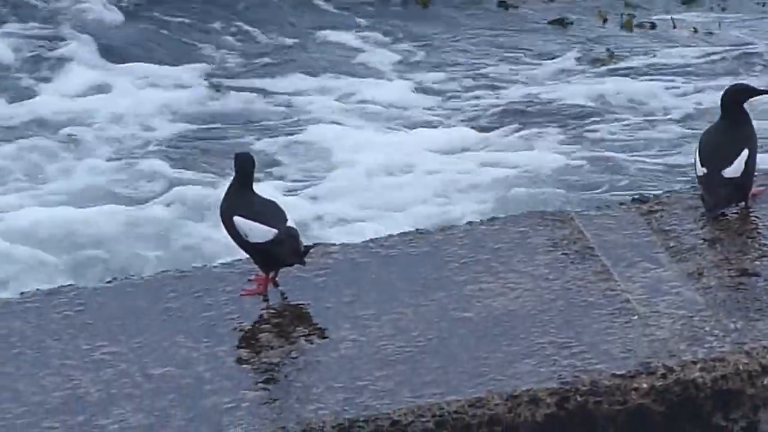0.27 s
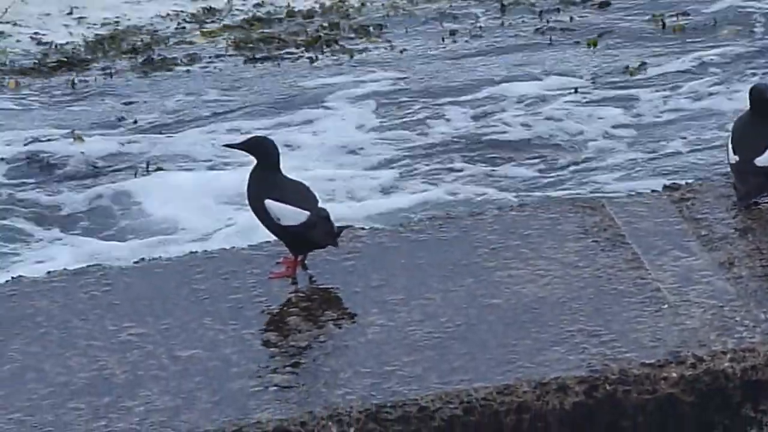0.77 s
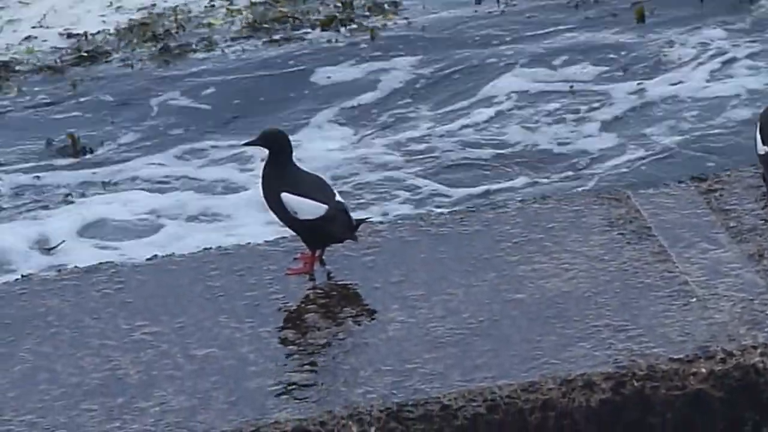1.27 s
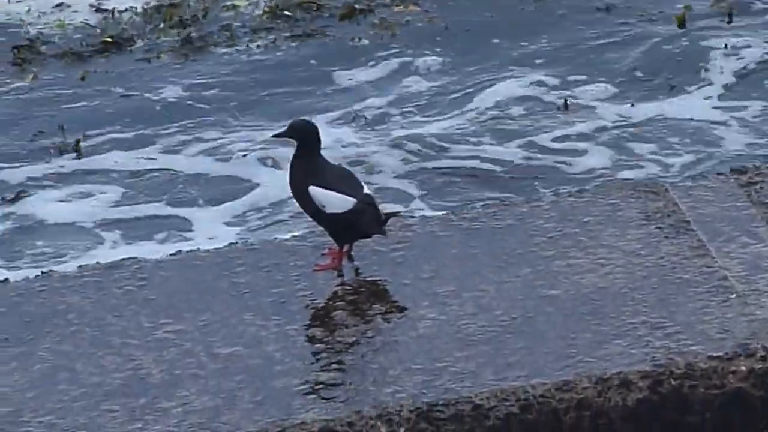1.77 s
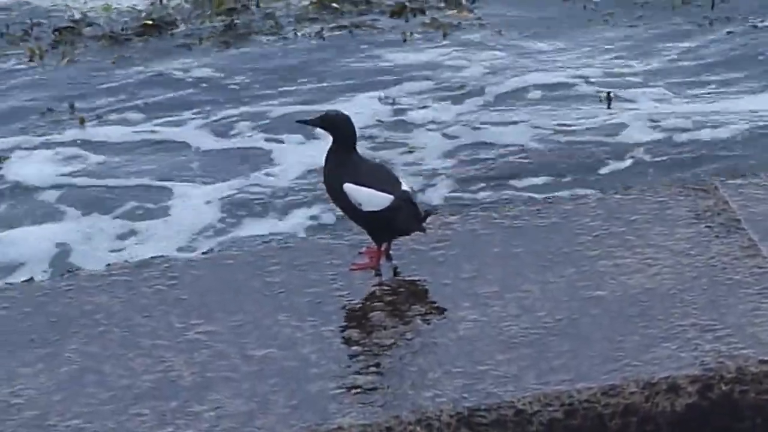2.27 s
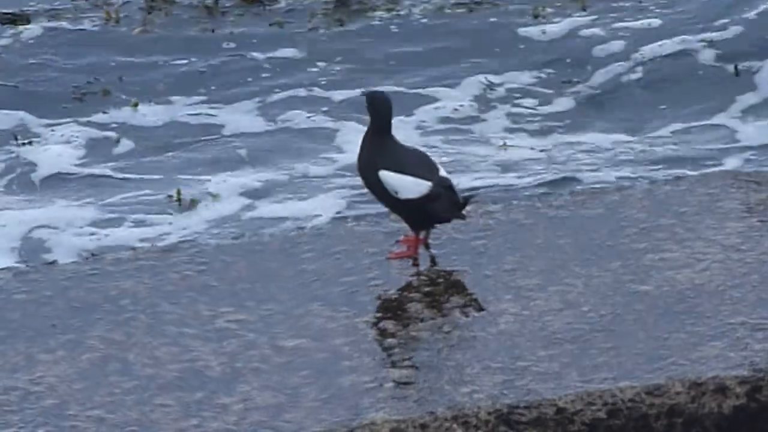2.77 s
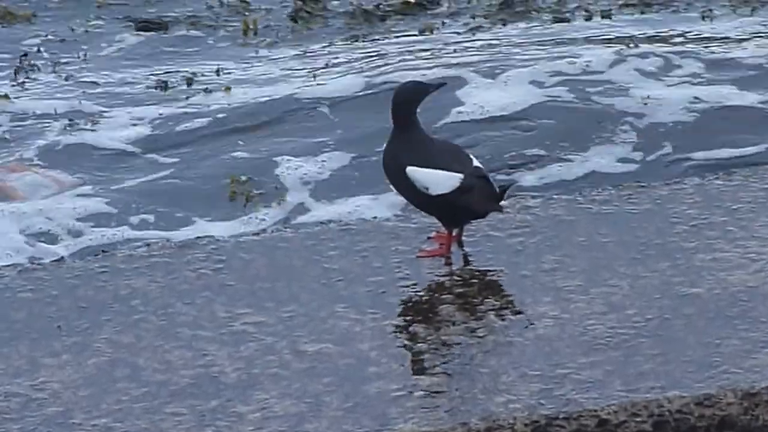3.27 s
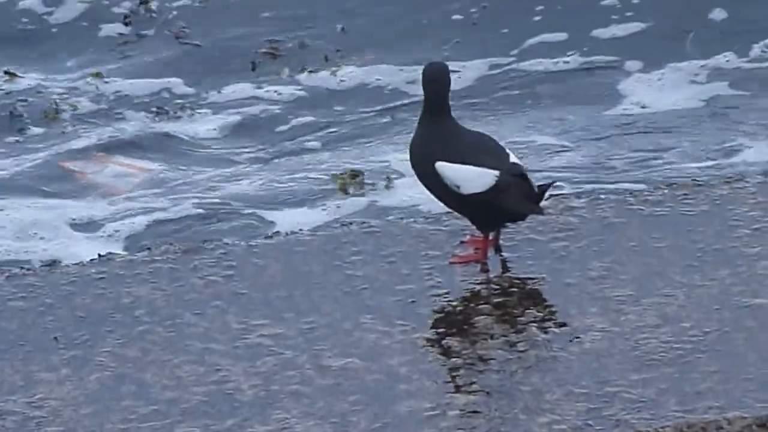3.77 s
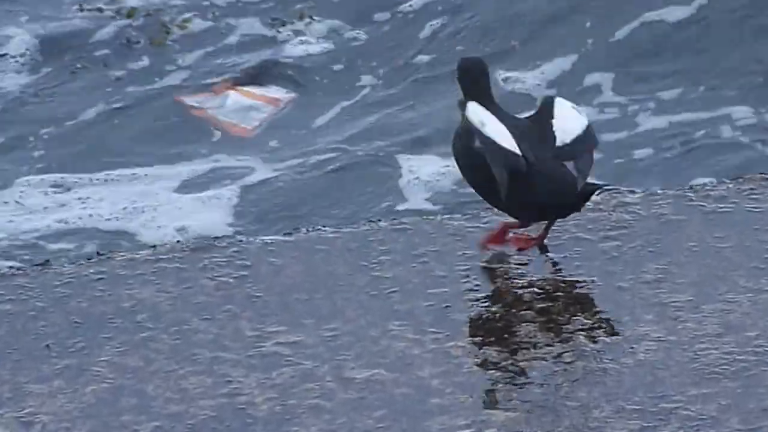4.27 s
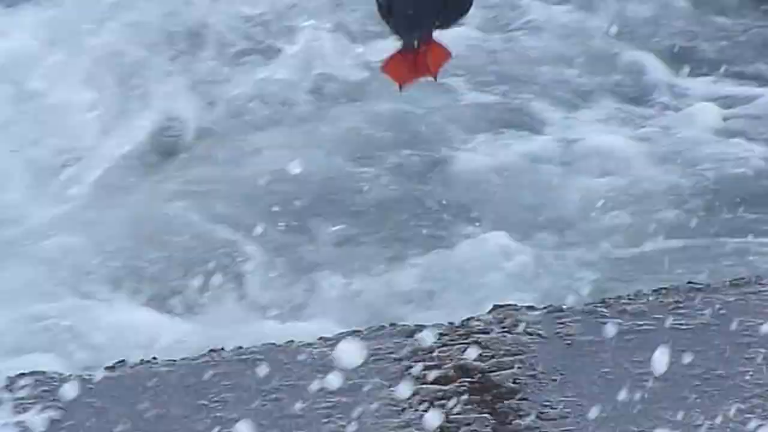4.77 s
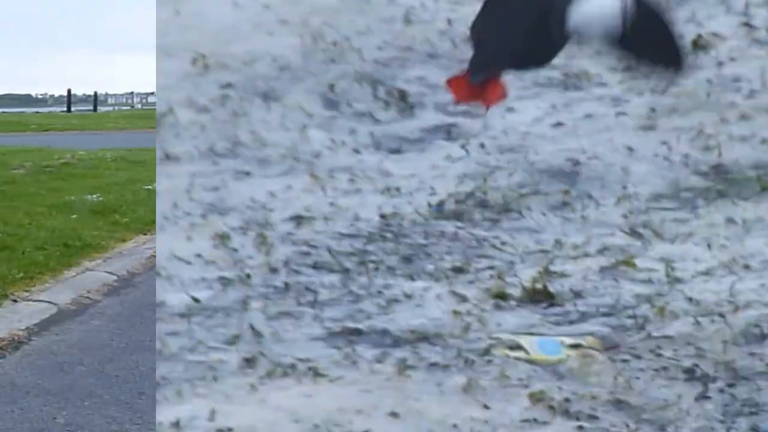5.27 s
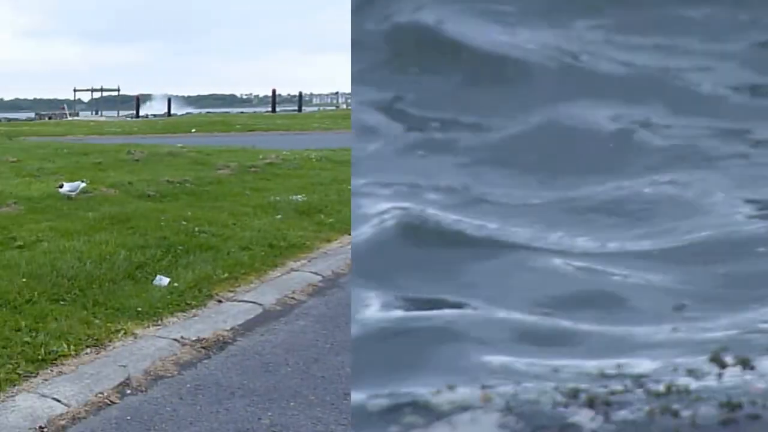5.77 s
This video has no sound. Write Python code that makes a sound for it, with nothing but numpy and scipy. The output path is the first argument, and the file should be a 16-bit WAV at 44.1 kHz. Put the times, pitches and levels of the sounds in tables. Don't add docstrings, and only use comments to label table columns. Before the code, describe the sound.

A rough sea churns against a concrete slipway a few metres from a small stereo camera. The sound is a continuous mid-heavy roar of bubbles and wash, thin in deep bass and limited in the high treble, swelling every fraction of a second. Wind buffets the microphones from the start, with a gust at 0.2 s and another near 0.6. In a short lull around 1.1 to 1.3 s, a surge brings a rapid cluster of short, hollow low slaps on concrete. From 1.5 s gusts return, rumbling and popping unevenly left and right, heavier at 2.6 and from 3.3 to 4.4 s, where they overload and make the level dip. Isolated dull slaps come near 2.1, 2.9 and 3.7 s. Around 4.7 to 5.1 s a brighter splash breaks with more thuds. After 5.3 s the surf recedes while gusts continue until about 5.9 s, leaving a weaker wash.

```python
import sys
import numpy as np
from scipy import signal
from scipy.fft import rfft, irfft, next_fast_len
from scipy.io import wavfile
from scipy.ndimage import uniform_filter1d

SR = 44100
rng = np.random.default_rng(int(sys.argv[2]) if len(sys.argv) > 2 else 0)


def to_wav(sig):
    pcm = np.clip(np.atleast_2d(sig), -1, 1) * 32767
    pcm = np.round(pcm).astype(np.int16)
    wavfile.write(sys.argv[1], SR, pcm.T)


def to_linear_factor(level_db):
    exponent = np.asarray(level_db, float) / 20
    return 10 ** exponent


N = 265967
TIME = np.arange(N) / SR
SIZE = next_fast_len(N + 8000)
BINS_HZ = np.maximum(np.arange(SIZE // 2 + 1) * SR / SIZE, 1)


def rms_one(x):
    return x / np.sqrt(np.mean(x ** 2) + 1e-20)


def at_hz(points, hz):
    table = np.array(points, float)
    return np.interp(np.log(hz), np.log(np.maximum(table[:, 0], 1)), table[:, 1])


def drift(rate):
    pole = np.exp(-80 * np.pi * rate / SR)
    noise = rng.standard_normal(N // 40 + 2002)
    slow = signal.lfilter([1], [1, -2 * pole, pole * pole], noise)[2000:]
    return np.interp(np.arange(N) / 40, np.arange(len(slow)), rms_one(slow))


def grainy(per_s, spread_db):
    sizes = to_linear_factor(spread_db * np.minimum(rng.exponential(1, SIZE), 3.5))
    signs = rng.choice([-1, 1], SIZE)
    happens = rng.random(SIZE) < per_s / SR
    return rms_one(sizes * signs * happens)


def surf():
    layers_hz = [500, 1500, 3500, 6500]
    # pitch_hz [Hz], level_db [dB per Hz]
    colour = [(40, -35.5), (130, -15), (220, -3.5), (320, 0.5), (800, 3.5), (1200, 0), (1700, -4.5),
              (2400, -3.5), (3500, 0.5), (5000, -5), (6200, -1.5), (7500, -8.5), (8600, -17.5), (9600, -18)]
    # pitch_hz [Hz], likeness [0 to 1]
    likeness = [(60, 0.88), (150, 1), (400, 1), (1000, 1), (1700, 0.81), (3000, 0.42), (5200, 0.42),
                (9000, .45)]
    # pitch_hz [Hz], lead_rad [radians]
    left_leads = [(0, 0), (1210, 0.2), (2500, 0.9), (3010, 1.1), (4220, 0.5), (9300, -0.1)]
    # pitch_hz [Hz], louder_db [dB]
    left_louder = [(300, 0), (900, 0), (1700, -5), (3600, -1), (5100, -4), (7200, -1), (9000, -1)]

    shared = rfft(grainy(per_s=9000, spread_db=2.0))
    apart = rfft(grainy(per_s=9000, spread_db=3.5))
    alike = np.clip(at_hz(likeness, BINS_HZ), 0, .999)
    ports = np.array([[1], [-1]])
    pair = np.sqrt(1 + alike) * shared + np.sqrt(1 - alike) * apart * ports
    pair = pair * np.exp(.5j * ports * at_hz(left_leads, BINS_HZ))
    pair = pair * to_linear_factor(.5 * ports * at_hz(left_louder, BINS_HZ))
    pair = pair * to_linear_factor(at_hz(colour, BINS_HZ) + 11.0)

    layers_db = surf_layers()
    slosh, patter, neighbour = drift(1.2), drift(25), drift(8)
    octave = np.log2(BINS_HZ)
    out = 0
    for centre in np.arange(5, 14, .5):
        band = np.cos(np.pi * np.clip(octave - centre, -.5, .5)) ** 2
        place = np.interp(centre, np.log2(layers_hz), [0, 1, 2, 3])
        share = np.maximum(1 - abs(place - np.arange(4)), 0)
        own = drift(14.6)
        flicker_db = 0.28 * slosh + 0.41 * patter + 0.28 * (own + neighbour)
        neighbour = own
        out = out + to_linear_factor(share @ layers_db + flicker_db) * irfft(pair * band, SIZE)[:, :N]
    return out


def surf_layers():
    # start_s [s], wash_force_db [dB], spray_db above it [dB], weight_db of water behind it [dB]
    waves = [(.1, -25.5, -11.5, 2), (.3, -29, -12, 2.5), (.6, -24.5, -11.5, 3.5), (.92, -25, -10, 2.5),
             (1.18, -20.5, -12.5, 3.5), (1.68, -25, -13.5, 4), (2.3, -26, -11, -1), (2.55, -22.5, -13.5, 4),
             (3.05, -24.5, -10.5, 4), (3.42, -26, -12, 0), (3.7, -22, -13, 1.5), (3.92, -27, -12.5, 3.5),
             (4.28, -24, -11, 0.5), (4.5, -29, -8.5, -2), (4.78, -23.5, -8, -0.5), (5.1, -22.5, -9, -1.5),
             (5.33, -31.5, -9.5, 0), (6.03, -35, -10.5, 0.5)]
    # level_db at mean force [dB], shares of the force, spray and weight swings [ratio]
    layers = [
        (-23.5, 0.86, .05, 0.88),
        (-26.5, 1.04, .05, -0.0024),
        (-35, 1.03, 0.51, .2),
        (-36, 1.09, 0.85, .05),
    ]

    start_s, *columns = np.transpose(waves)
    controls_db = np.array([np.interp(TIME, start_s, column) for column in columns])
    swing_db = controls_db - controls_db.mean(axis=1, keepdims=True)
    return np.array([level_db + np.array(shares) @ swing_db for level_db, *shares in layers])


def thumps():
    # start_s [s], peak_db [dB]
    slams = [(1.113, -6), (1.132, -1), (1.157, -2), (1.171, -4), (1.246, -4), (1.269, -6), (1.305, -9),
             (1.53, -13), (1.97, -10), (2.102, -7), (2.878, -8.5), (3.685, -8), (4.693, -10), (4.751, -10),
             (5.306, -9), (5.996, -21)]
    start_s, peak_db = np.transpose(slams)
    clicks = np.zeros(N)
    clicks[(start_s * SR).astype(int)] = to_linear_factor(peak_db)
    hit = signal.sosfilt(signal.butter(2, 300, "high", fs=SR, output="sos"), clicks)
    return to_linear_factor(-9.0) * (ring(hit, 490, 0.022) + ring(hit, 800, 0.045))


def ring(clicks, hz, t60):
    decay = to_linear_factor(-60 / (t60 * SR))
    turn = 2 * np.pi * hz / SR
    return signal.lfilter([0, np.sin(turn)], [1, -2 * decay * np.cos(turn), decay * decay], clicks + 1e-18)


def wind():
    # pitch_hz [Hz], level_db [dB per Hz]
    colour = [(30, -8), (60, -5), (158, -3), (240, -1), (330, 1), (531, -2.5), (854, -9), (1400, -18),
              (2500, -30), (6000, -55)]
    # start_s [s], left_peak_db [dB], right_peak_db [dB]
    strong_pops = [(0.069, -6, -13), (0.184, -30, -8), (0.579, -13, -8), (0.613, -5, -14), (1.497, -5, -10),
                   (1.543, -30, -7), (1.795, -6, -18), (1.864, -6, -21), (2.529, -7, -14), (2.63, -3, -8),
                   (2.782, -7, -12), (3.25, -7, -14), (3.292, -13, -5), (3.419, -7, -13), (3.531, -3, -10),
                   (3.555, -7, -19), (3.828, -6, -12), (3.845, -3, -5), (4.117, -6, -11), (4.151, -3, -11),
                   (4.323, -7, -11), (4.341, -4, -13), (4.384, -16, -7), (5.086, -4, -9), (5.163, -11, -14),
                   (5.309, -5, -5), (5.366, -7, -12), (5.436, -9, -11), (5.581, -9, -3), (5.682, -11, -19)]
    shared_below_hz = 66

    gust_db = gusts()
    lumps_db = np.array([1.6 * drift(40) + .3 * drift(9) for port in range(2)])
    eddies = rfft(np.array([grainy(per_s=1500, spread_db=2.5) for port in range(2)]))
    eddies = eddies + .7 * eddies[::-1] / (1 + (BINS_HZ / shared_below_hz) ** 2)
    rumble = irfft(eddies * to_linear_factor(at_hz(colour, BINS_HZ)), SIZE)[:, :N]
    rumble = rumble / np.sqrt(uniform_filter1d(rumble ** 2, size=2600))
    all_pops = np.vstack([strong_pops, lesser_pops(gust_db)])
    return to_linear_factor(gust_db + lumps_db) * rumble + to_linear_factor(-1.5) * pops(all_pops)


def gusts():
    # reached_s [s], held_s [s], left_db [dB], right_db [dB]
    blows = [(0.061, 0.012, -23.5, -19.5), (.18, 0.014, -14.5, -16.5), (.3, .25, -22.5, -27.5),
             (.62, .01, -17, -21.5), (.71, 0.0087, -25, -25.5), (.86, .04, -37, -43),
             (1.38, .01, -29.5, -35), (1.53, .03, -21, -19), (1.83, 0.032, -16.5, -19.5),
             (2.0, .04, -19.5, -25), (2.17, 0.087, -20, -21), (2.42, 0.0089, -22.5, -31),
             (2.53, 0.28, -22, -21.5), (2.96, 0.2, -24, -23), (3.25, 0.059, -20, -18),
             (3.42, 0.03, -19, -18), (3.55, 0.055, -15, -18.5), (3.8, 0.054, -13, -15.5),
             (3.95, 0.088, -24.5, -21), (4.15, 0.017, -16, -16.5), (4.352, 0.027, -11.5, -12),
             (4.53, 0.12, -20, -20.5), (4.78, .02, -22, -22.5), (4.92, 0.059, -23, -25.5),
             (5.1, 0.035, -16, -16), (5.24, .02, -18.5, -17), (5.379, 0.077, -15.5, -17),
             (5.58, 0.0093, -26.5, -20.5), (5.67, 0.054, -19.5, -21), (5.86, .14, -22.5, -22.5)]
    rise_db_per_s, fall_db_per_s, lull_db = 191, 112.5, -52
    power = to_linear_factor(lull_db) ** 2
    for reached_s, held_s, *peak_db in blows:
        before_s = np.maximum(reached_s - TIME, 0)
        after_s = np.maximum(TIME - reached_s - held_s, 0)
        loss_db = rise_db_per_s * before_s + fall_db_per_s * after_s
        power = power + to_linear_factor(np.array(peak_db)[:, None] - loss_db) ** 2
    return 10 * np.log10(power)


def pops(rows):
    out = np.zeros((2, N + 600))
    around_s = np.arange(-300, 300) / SR
    for (start_s, *peak_db), (pitch, phase) in zip(rows, rng.random((len(rows), 2))):
        hz = 260 + 260 * pitch
        swing = np.cos(2 * np.pi * (hz * around_s + phase)) * np.exp(-(hz * around_s / .62) ** 2)
        at = int(start_s * SR)
        out[:, at:at + 600] += to_linear_factor(peak_db)[:, None] * swing
    return out[:, 300:N + 300]


def lesser_pops(gust_db):
    count, over_gust_db, far_port_loss_db = 60, 9.5, 16
    when, side = rng.random((count, 2)).T
    at = (when * (N - 1)).astype(int)
    loss_db = far_port_loss_db * np.maximum([2 * side - 1, 1 - 2 * side], 0)
    return np.vstack([at / SR, gust_db[:, at] + over_gust_db - loss_db]).T


def scene():
    return surf() + thumps() + wind()


def roll_off(x):
    return signal.sosfilt(signal.butter(12, 9710, fs=SR, output="sos"), x)


def record(dry):
    # start_s [s], depth_db [dB]
    ducks = [(.15, 2.5), (0.612, 3), (1.294, 2), (1.545, 5), (1.797, 5), (2.63, 4.5), (3.291, 3),
             (3.531, 5.5), (3.561, 8), (3.791, 4), (4.329, 6.5), (5.097, 6), (5.368, 4.5), (5.398, 3.5),
             (5.583, 1), (5.679, 3), (5.878, 3.5)]
    # pitch_hz [Hz], width_hz [Hz]
    notches = [(2598, 520), (4600, 600), (5432, 420), (7904, 500), (8097, 500)]
    # pitch_hz [Hz], width_hz [Hz], boost_db [dB]
    between = (8000, 38, 17.5)
    attack_s, recovery_s = 0.0016, 0.091

    duck_db = 0
    for start_s, depth_db in ducks:
        since_s = np.maximum(TIME - start_s - .003, 0)
        duck_db = duck_db + depth_db * np.exp(-since_s / recovery_s) * (1 - np.exp(-since_s / attack_s))
    x = signal.sosfilt(signal.butter(3, 129, "high", fs=SR, output="sos"), dry)
    x = 1.4 * np.tanh(x * to_linear_factor(-duck_db) / 1.4)

    shape = np.ones(len(BINS_HZ), complex)
    for hz, width_hz in notches:
        off_hz = BINS_HZ - hz ** 2 / BINS_HZ
        shape = shape * (1j * off_hz + .012 * width_hz) / (1j * off_hz + width_hz)
    hz, width_hz, boost_db = between
    off_hz = BINS_HZ - hz ** 2 / BINS_HZ
    shape = shape * (1 + to_linear_factor(boost_db) * width_hz / (1j * off_hz + width_hz))
    x = irfft(rfft(x, SIZE) * shape, SIZE)[:, :N]
    x = signal.sosfilt(signal.cheby2(14, 60, 10150, fs=SR, output="sos"), x)
    return roll_off(x)


dry = scene()
out = record(dry)
to_wav(out)
```